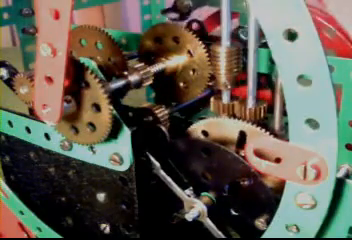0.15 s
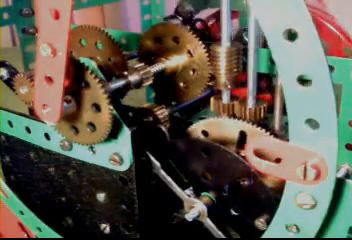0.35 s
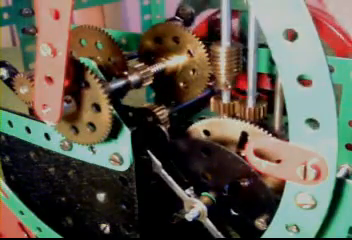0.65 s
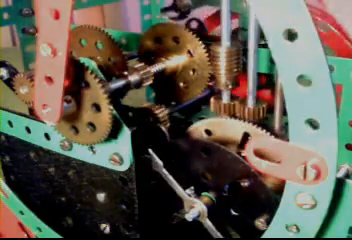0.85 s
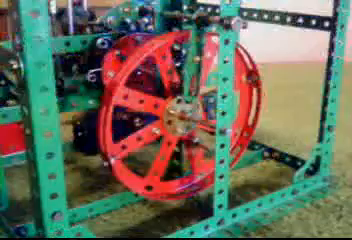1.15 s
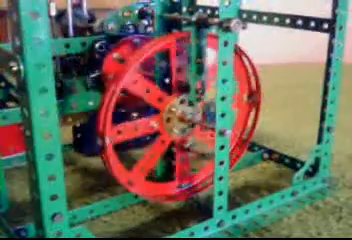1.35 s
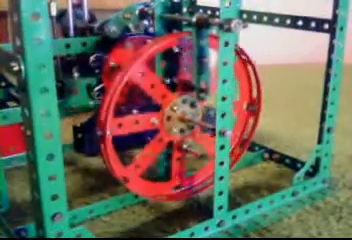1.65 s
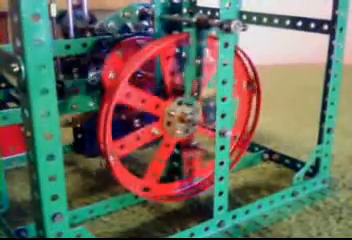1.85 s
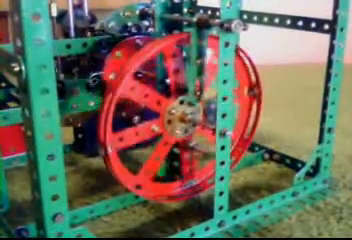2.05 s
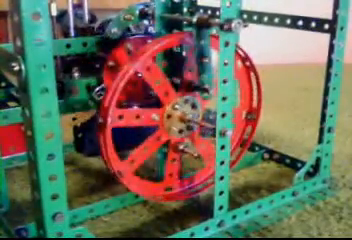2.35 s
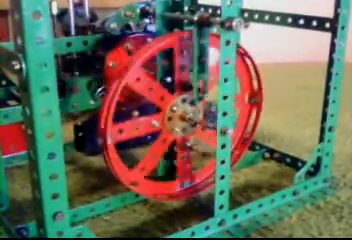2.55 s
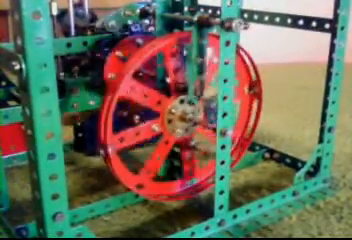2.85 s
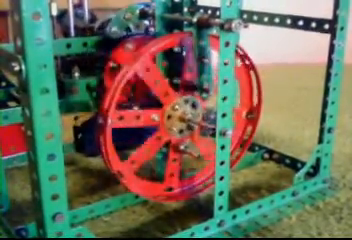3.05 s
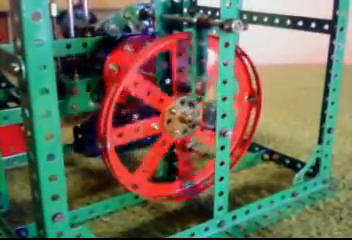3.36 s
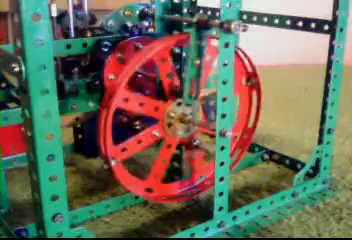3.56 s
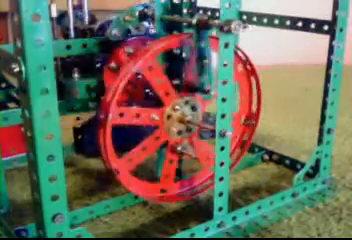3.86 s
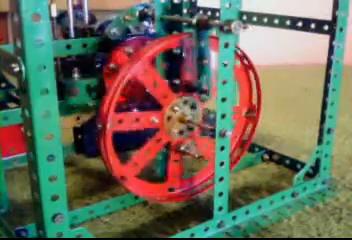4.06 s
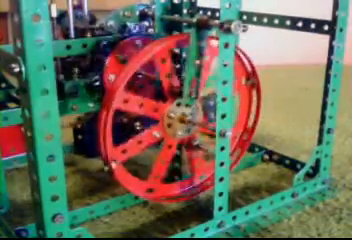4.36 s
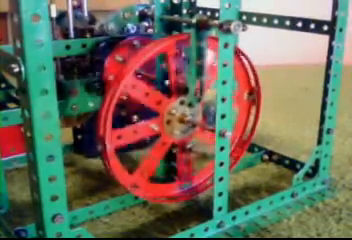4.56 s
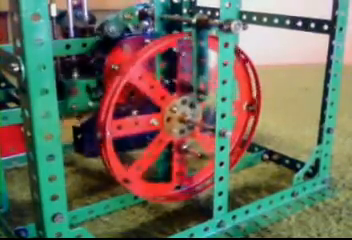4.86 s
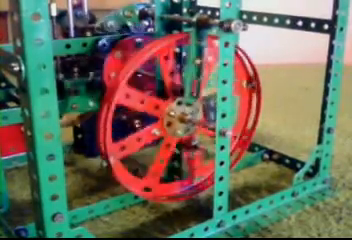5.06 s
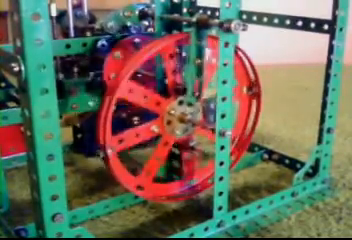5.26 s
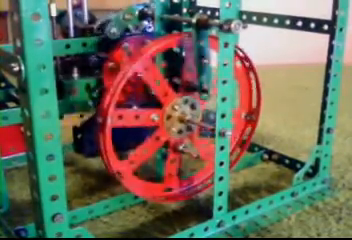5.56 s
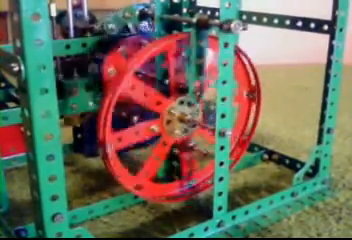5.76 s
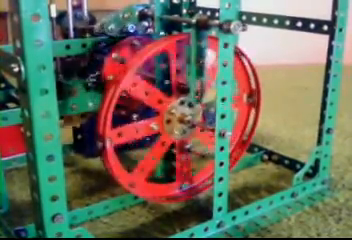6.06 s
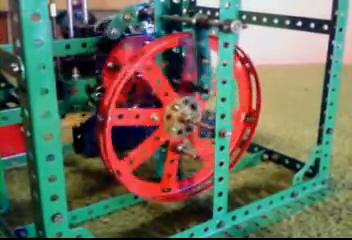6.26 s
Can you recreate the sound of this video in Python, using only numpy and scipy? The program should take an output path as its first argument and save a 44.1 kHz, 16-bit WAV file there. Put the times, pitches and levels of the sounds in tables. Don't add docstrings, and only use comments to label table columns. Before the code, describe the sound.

A clock mechanism bolted from metal strips ticks close to a small microphone in a quiet carpeted room. Two louder ticks come first over stronger hiss, then the sound cuts to total silence for a moment. It resumes a little quieter, ticking evenly about five times in two seconds, each tick a bright, dry clatter with a faint low thump.

```python
import sys
import numpy as np
from scipy import signal
from scipy.fft import rfft, irfft, next_fast_len
from scipy.io import wavfile
from scipy.ndimage import uniform_filter1d

SR = 44100
rng = np.random.default_rng(int(sys.argv[2]) if len(sys.argv) > 2 else 0)


def volts(x):
    e = np.asarray(x, float) / 20
    return 10 ** e


def inscribe(sig):
    pcm = np.round(np.clip(np.atleast_2d(sig).T, -1, 1) * 32767)
    wavfile.write(sys.argv[1], SR, pcm.astype(np.int16))


N = 283122

# pitch_hz, level_db [dB per Hz]
HISS_COLOUR = [(20, -9), (50, -10.5), (90, -2.5), (250, -2), (600, -5.5), (1200, -8), (2500, -10.5),
               (5000, -15), (8600, -20), (9800, -22), (10600, -26.5), (12000, -70.5)]
HUM_PITCHES = [49, 377, 563, 1128, 1322]
# width_hz, level_db
HUM_BANDS = [(9, -62), (10, -75), (17, -66), (3, -65), (13, -68.5)]
# start_s, hiss_db, offset [full scale]
SHOTS_OVER_TIME = [
    (0, -49.5, -.0258),
    (.879, -49.5, -.0254),
    (1.181, -55, .0028),
    (2.4, -55, .002),
    (4.4, -55.5, .0007),
    (6.42, -55, -.001),
]
# unlock_s, wait_s [until the impulse], impulse_db, fading [dB/s], brightest_hz
TICK_EVENTS = [(.217, .006, -25, 420, 5300), (.569, 0.005, -19, 748.5, 4260),
               (1.224, .002, -30.5, 452, 3840), (1.584, 0.0034, -23.5, 482, 4500),
               (1.975, .0025, -30.5, 447.5, 4720), (2.4128, 0.0046, -25, 452, 4300),
               (2.7776, .003, -29, 599, 5300), (3.2114, .008, -28, 750, 4600),
               (3.575, .0027, -28.5, 475.5, 5150), (4.036, .005, -26, 522, 4540),
               (4.3903, .003, -29, 417.5, 3940), (4.8267, .007, -28.5, 553.5, 4370),
               (5.2048, 0.0016, -32.5, 699.5, 5530), (5.544, .0045, -24.5, 650, 4300),
               (5.9414, .003, -30.5, 519, 4990), (6.365, .004, -26, 480, 4300)]
# lower_base_db, upper_base_db, mid_frame_db
TICK_JOLTS = [(-48.5, -45, 8), (-46.5, -45, 6.5), (-59, -56.5, 10), (-53, -50.5, 12), (-54, -62.5, 9.5),
              (-50, -51.5, 8.5), (-54.5, -55, 9), (-58, -57.5, 13), (-53, -55, 11), (-49.5, -56.5, 12.5),
              (-61, -60, 12), (-53, -66, 12.5), (-55, -58, 7.5), (-51, -53.5, 10.5), (-54, -59, 5),
              (-51, -58, 10)]
# start_s, level_db, brightest_hz
LOCK_TOUCHES = [(.212, -34.5, 2750), (.2373, -26.5, 4300), (.6092, -28.5, 3005), (1.262, -34, 2820),
                (2.002, -31, 3680), (2.0223, -37, 4100), (2.4435, -30.5, 4300), (2.452, -38, 2580),
                (2.8036, -31, 3860), (3.2452, -33.5, 3700), (3.2655, -44.5, 2930), (4.0767, -40, 4300),
                (4.3584, -43, 3900), (.19, -41, 3530), (2.4097, -39, 3870), (4.8685, -35, 4750),
                (5.2207, -32, 4210), (5.234, -36.5, 2850), (5.239, -32, 4300), (5.5898, -40, 2300),
                (5.96, -36.5, 4090)]
# pitch_hz, level_db [dB per Hz]
RATTLE_COLOUR = [(200, -41.5), (600, -18), (1000, -15.5), (1500, -10), (2700, -4), (4300, -2), (5500, -3.5),
                 (6800, -1), (8200, -11), (9500, -16), (11000, -50)]
STRIP_PITCHES = [1190, 1322, 1480, 1642, 2180, 2378, 2543, 2792, 3422, 3550, 3745, 3810, 3920, 4050, 4135,
                 4280, 4390, 4520, 4670, 4800, 5220, 5440, 5640, 5940, 6400, 6680, 6900, 7280, 8200, 8700]
# pitch_hz, level_db, t60_s
STRIP_RING = [(1090, -11, 0.085), (1280, -6.5, 0.08), (1770, -5.5, 0.055), (2400, -17, 0.1),
              (3340, -21, 0.18), (4300, -15.5, 0.084), (5300, 0, 0.015), (6700, 0, 0.01),
              (8420, -19.5, 0.076)]
BASE_PITCHES = (168.9, 232.6)
BASE_RINGS = (0.11, 0.16)
BASE_DELAYS = (0.0052, 0.0159)
# pitch_hz, level_db [dB per Hz]
SHUDDER_COLOUR = [(60, -16.5), (130, -17), (330, -5.5), (600, -8.5), (1000, -12.5), (1400, -24.5)]
# start_s, length_s, level_db
TREBLE_BLOCKS = [(0.097, 0.06, -72), (0.214, 0.052, -55), (0.562, 0.054, -52.5), (0.647, 0.013, -72),
                 (1.225, 0.048, -64), (1.583, 0.05, -57), (1.976, 0.04, -66), (2.415, 0.037, -53),
                 (2.776, 0.03, -64), (3.21, 0.052, -63), (3.572, 0.035, -61), (4.033, 0.056, -63.5),
                 (4.387, 0.046, -61.5), (4.826, 0.054, -65), (5.208, 0.039, -70), (5.54, 0.047, -60),
                 (5.936, 0.032, -68), (6.357, 0.039, -57)]
# start_s, length_s
STRAY_PATCHES = [(0.043, 0.063), (0.306, 0.12), (.501, .031), (0.636, .03), (0.68, .029), (0.74, 0.048),
                 (0.864, 0.015), (1.17, 0.014), (1.305, 0.015), (1.369, 0.0089), (1.51, 0.017),
                 (1.64, 0.045), (1.734, 0.022), (1.927, 0.0097), (2.11, 0.0092), (2.493, 0.026),
                 (2.737, .02), (2.895, .018), (3.517, 0.02), (3.635, 0.033), (4.948, 0.02), (5.446, .026)]
TICKS_WITHOUT_PATCH = (2, 7, 10)


def at_hz(points, hz):
    points = np.array(points)
    return np.interp(np.log(hz), np.log(points[:, 0]), points[:, 1])


def colour(x, spectrum):
    size = next_fast_len(N)
    hz = np.maximum(np.arange(size // 2 + 1) * SR / size, 1)
    y = irfft(rfft(x, size) * volts(at_hz(spectrum, hz)), size)[:N]
    return y * np.std(x) / np.std(y)


def band(x, lo_hz, hi_hz, order=4):
    return signal.sosfilt(signal.butter(order, [lo_hz, hi_hz], "band", fs=SR, output="sos"), x)


def fade(clicks, t60_s):
    return signal.lfilter([1], [1, -volts(-60 / (t60_s * SR))], clicks + 1e-18)


def ring(clicks, hz, t60_s):
    r = volts(-60 / (t60_s * SR))
    w = 2 * np.pi * hz / SR
    return signal.lfilter([0, np.sin(w)], [1, -2 * r * np.cos(w), r * r], clicks + 1e-18)


def drift(rate_hz):
    knots = rng.standard_normal(int(N / SR * 200) + 2)
    return np.interp(np.arange(N) / SR * rate_hz, np.arange(len(knots)), knots) * 1.41


def room(hiss_db):
    out = colour(rng.standard_normal(N), HISS_COLOUR) * volts(0.073 * drift(6.5))
    for hz, (width_hz, level_db) in zip(HUM_PITCHES, HUM_BANDS):
        whirr = band(rng.standard_normal(N), hz - width_hz / 2, hz + width_hz / 2, order=1)
        out += volts(level_db + 49.5) * whirr / np.std(whirr)
    return volts(hiss_db) * out


def contacts():
    unlock_db = -8
    chatter_gap_s, chatter_db, chatter_spread_db = .0042, -2.5, 2.2
    pitch_spread, sag_hz_per_s = .12, 9000
    rows = list(LOCK_TOUCHES)
    luck = rng.standard_normal((len(TICK_EVENTS), 3, 11))
    for (s, wait_s, level_db, fade_db_per_s, hz), (gap, size, pitch) in zip(TICK_EVENTS, luck):
        rows.append((s, level_db + unlock_db, hz))
        rows.append((s + wait_s / 2, level_db + unlock_db / 2, hz))
        rows.append((s + wait_s, level_db, hz))
        after_s = np.cumsum(chatter_gap_s * np.exp(.3 * gap))
        touch_db = level_db + chatter_db - fade_db_per_s * after_s + chatter_spread_db * size
        touch_hz = (hz - sag_hz_per_s * after_s) * np.exp(pitch_spread * pitch)
        rows += zip(s + wait_s + after_s, touch_db, touch_hz)
    return [row for row in rows if row[0] < N / SR]


def contact_clicks(rows):
    clicks = np.zeros(N)
    for s, level_db, _ in rows:
        clicks[round((s - .0008) * SR)] = volts(level_db)
    return clicks


def cracks(rows):
    rise_s, fall_s = 0.00028, 0.0019
    out = np.zeros(N + 900)
    t = np.arange(900) / SR
    shape = (1 - np.exp(-t / rise_s)) * np.exp(-t / fall_s)
    size = (len(rows), len(t))
    grains = rng.standard_normal(size) * volts(4.5 * rng.standard_normal(size))
    for (s, level_db, hz), grain in zip(rows, grains * shape):
        lively = ring(grain, hz, 0.01)
        crack = grain / np.std(grain) + 0.41 * lively / np.std(lively)
        at = round((s - .0004) * SR)
        out[at:at + len(t)] += volts(level_db - 8.5) * crack
    return out[:N]


def rattle(clicks, rows):
    power = fade(fade(clicks ** 2, 0.012), 0.077) / (0.023 * SR / 7)
    wash = volts(-7) * np.sqrt(power) * rng.standard_normal(N)
    return colour(cracks(rows) + wash, RATTLE_COLOUR)


def current_tick():
    starts_s = np.array(TICK_EVENTS)[:, 0] - .045
    return np.maximum(np.searchsorted(starts_s, np.arange(N) / SR) - 1, 0)


def frame(clicks):
    chatter = np.sqrt(fade(fade(clicks ** 2, 0.0049), 0.0099) / 30) * rng.standard_normal(N)
    tick = current_tick()
    mid_db = np.array(TICK_JOLTS)[tick, 2]
    spread_db = 1.8 * rng.standard_normal((len(TICK_EVENTS), len(STRIP_PITCHES)))
    table_hz, table_db, table_t60_s = np.transpose(STRIP_RING)
    out = np.zeros(N)
    for k, hz in enumerate(STRIP_PITCHES):
        low_share = np.clip((2600 - hz) / 1000, 0, 1)
        level_db = np.interp(hz, table_hz, table_db) - 30.0 + spread_db[tick, k]
        gain = volts(level_db + low_share * (mid_db - 17.0))
        out += (-1) ** k * ring(chatter * gain, hz, np.interp(hz, table_hz, table_t60_s))
    return out


def base():
    out = np.zeros(N)
    for k, (hz, t60_s, delay_s) in enumerate(zip(BASE_PITCHES, BASE_RINGS, BASE_DELAYS)):
        jolts = np.zeros(N)
        signs = rng.choice([-1, 1], len(TICK_EVENTS))
        for row, jolt_db, sign in zip(TICK_EVENTS, TICK_JOLTS, signs):
            jolts[round((row[0] + delay_s) * SR)] = sign * volts(jolt_db[k])
        out += ring(ring(jolts, hz, t60_s), hz * 1.02, t60_s) / (t60_s * SR / 38)
    return volts(2) * out


def shudder():
    impulse_db = np.array(TICK_EVENTS)[:, 2]
    jolts = np.zeros(N)
    jolts[[round(row[0] * SR) for row in TICK_EVENTS]] = volts(-49.5 + .8 * (impulse_db + 28))
    swell = fade(fade(jolts, 0.097), 0.16) / (.1 * SR / 14)
    return volts(-1) * swell * colour(rng.standard_normal(N), SHUDDER_COLOUR)


def scene():
    start_s, hiss_db, _ = np.transpose(SHOTS_OVER_TIME)
    air = room(np.interp(np.arange(N) / SR, start_s, hiss_db))
    rows = contacts()
    clicks = contact_clicks(rows)
    clock = volts(-8.0) * rattle(clicks, rows) + frame(clicks) + base() + shudder()
    return np.tile(clock + air, (2, 1))


def steep(x, lo_hz, hi_hz):
    return signal.sosfilt(signal.ellip(6, 1, 70, [lo_hz, hi_hz], "band", fs=SR, output="sos"), x)


def add_block(out, source, s, length_s, level_db, lo_hz, hi_hz):
    a = round(s * SR)
    b = min(round((s + length_s) * SR) + 200, N)
    gate = signal.windows.tukey(b - a, min(500 / (b - a), 1))
    piece = steep(source[a:b] * gate, lo_hz, hi_hz)
    out[a:b] += volts(level_db) * gate * piece / np.std(piece)


def patches():
    blocks = [(s, length_s, -74.5) for s, length_s in STRAY_PATCHES]
    for k, row in enumerate(TICK_EVENTS):
        if k not in TICKS_WITHOUT_PATCH:
            blocks.append((row[0] + 0.023, 0.038, -75))
    return blocks


def copied_top(x):
    shift = np.exp(2j * np.pi * 6600 * np.arange(N) / SR)
    moved = np.real(signal.hilbert(band(x, 4200, 9500)) * shift)
    tilted = colour(moved, [(10000, -8.5), (12400, 1.0), (13500, 1.5), (15300, 21)])
    out = np.zeros(N)
    for s, length_s, level_db in patches():
        add_block(out, moved, s, length_s, level_db, 10500, 11800)
    for s, length_s, level_db in TREBLE_BLOCKS:
        edge_hz = 14300 + 94 * (level_db + 59.5)
        body_hz = edge_hz - 490
        add_block(out, tilted, s, length_s, level_db - 4.0, 12450, max(body_hz, 13000))
        add_block(out, tilted, s, min(0.023, length_s), level_db - 1.5, body_hz, edge_hz + 350)
    return out


def channel_difference(mono):
    out = np.zeros(N)
    edges = np.r_[np.geomspace(800, 6000, 10), np.arange(7000, 15100, 1000)]
    for lo_hz, hi_hz in zip(edges, edges[1:]):
        gate = np.clip(drift(22) - 1.1 + .5 * np.log10(lo_hz / 1000), 0, 1)
        power = uniform_filter1d(band(mono, lo_hz, hi_hz, order=2) ** 2, size=700)
        noise = band(rng.standard_normal(N), lo_hz, hi_hz, order=3)
        gain = volts(-17 + 8.0 * (lo_hz > 10500))
        out += gain * gate * np.sqrt(power + 1e-16) * noise / np.std(noise)
    return out


def low_pass(x):
    return signal.sosfilt(signal.butter(12, 16170, fs=SR, output="sos"), x)


def record(dry):
    t = np.arange(N) / SR
    start_s, _, offset = np.transpose(SHOTS_OVER_TIME)
    running = (t < .8794) | (t >= 1.1793)
    mono = signal.sosfiltfilt(signal.butter(7, 9820, fs=SR, output="sos"), dry[0])
    mono = (mono + np.interp(t, start_s, offset)) * running
    mono = signal.sosfilt(signal.cheby2(10, 60, 12000, fs=SR, output="sos"), mono)
    mono = mono + copied_top(dry[0])
    return low_pass(mono + channel_difference(mono) * [[1], [-1]])


dry = scene()
out = record(dry)
inscribe(out)
```